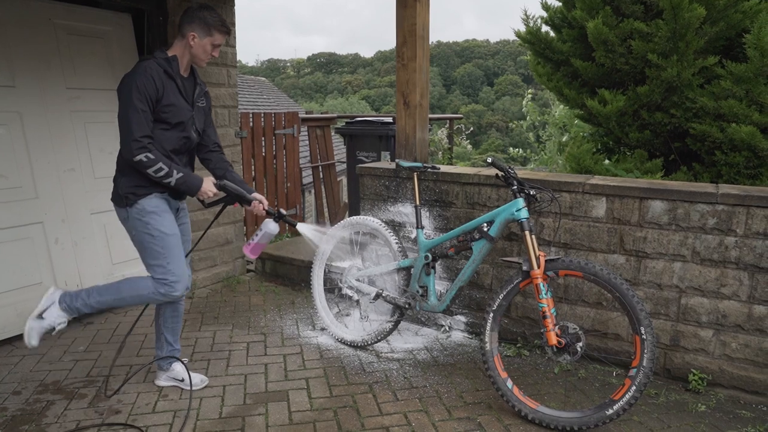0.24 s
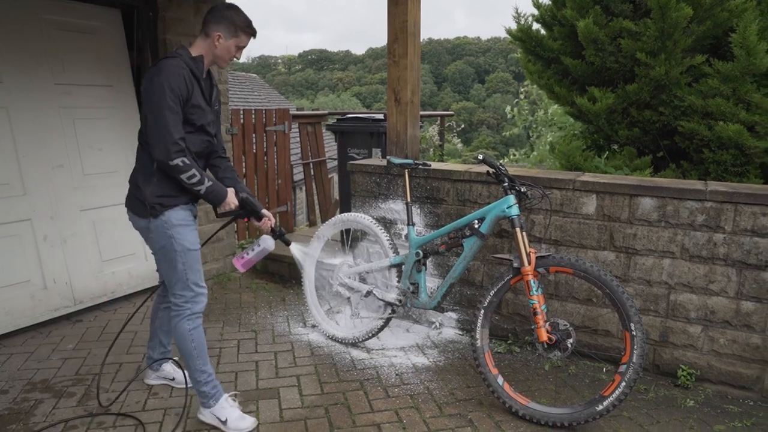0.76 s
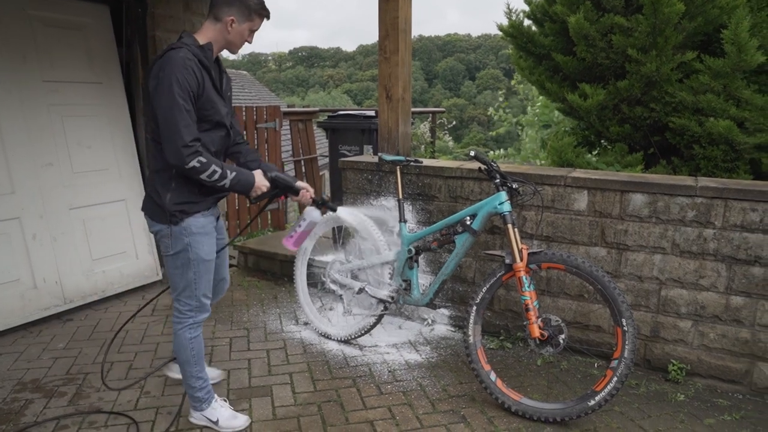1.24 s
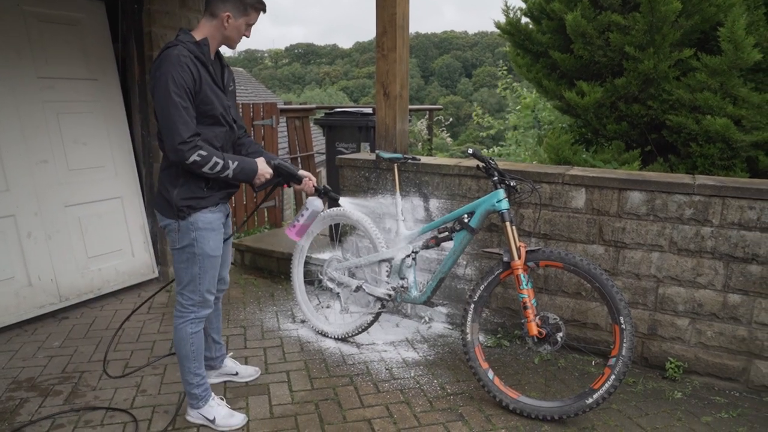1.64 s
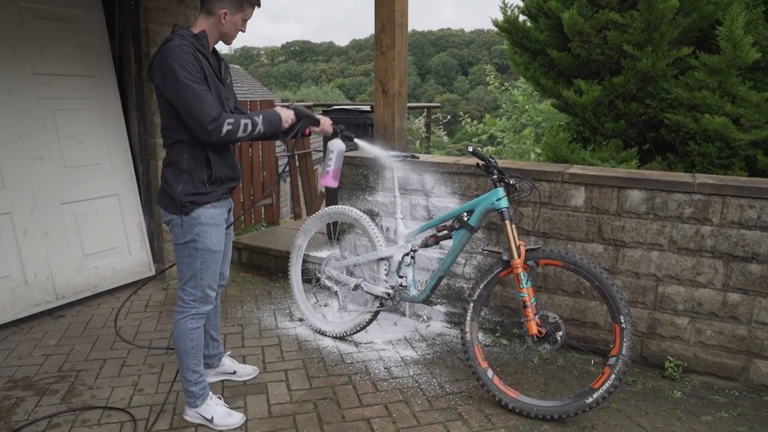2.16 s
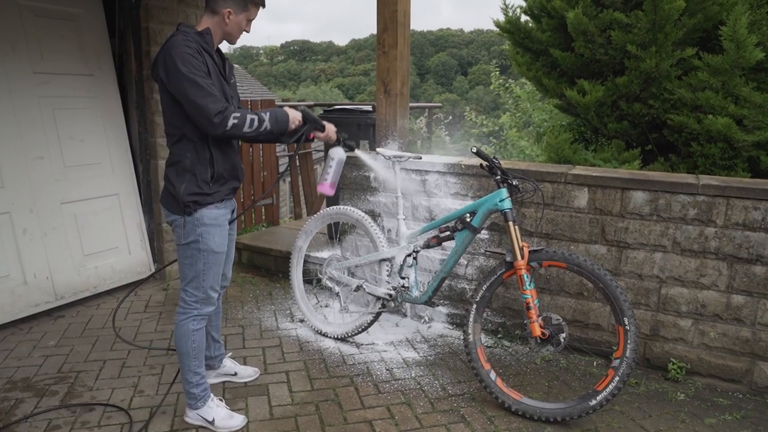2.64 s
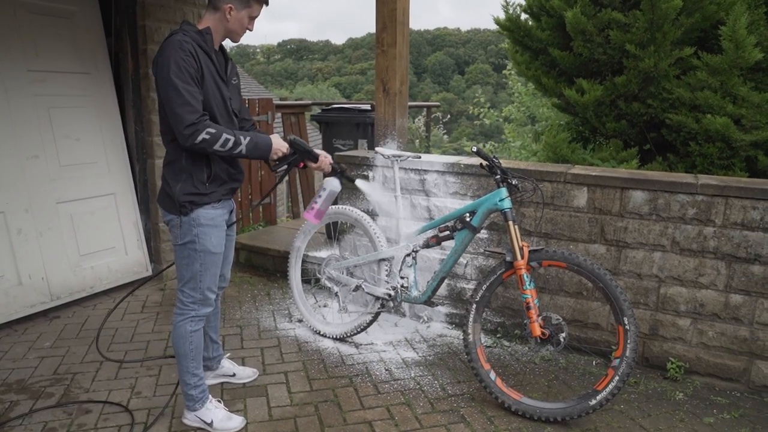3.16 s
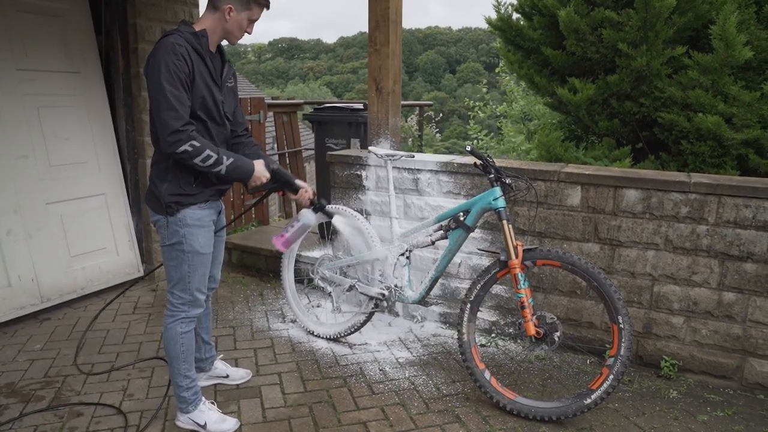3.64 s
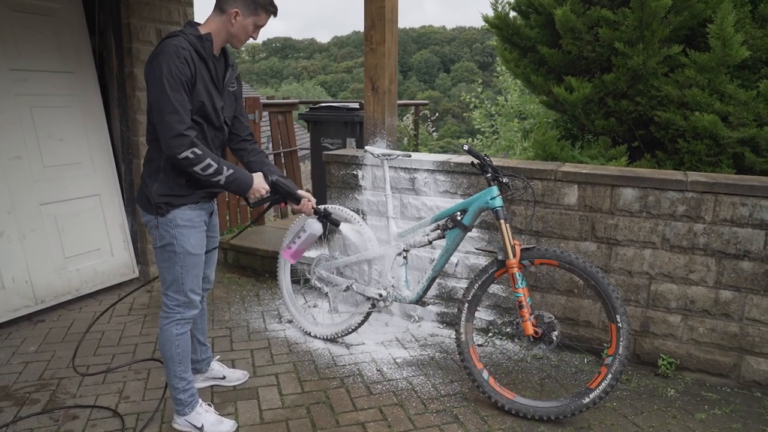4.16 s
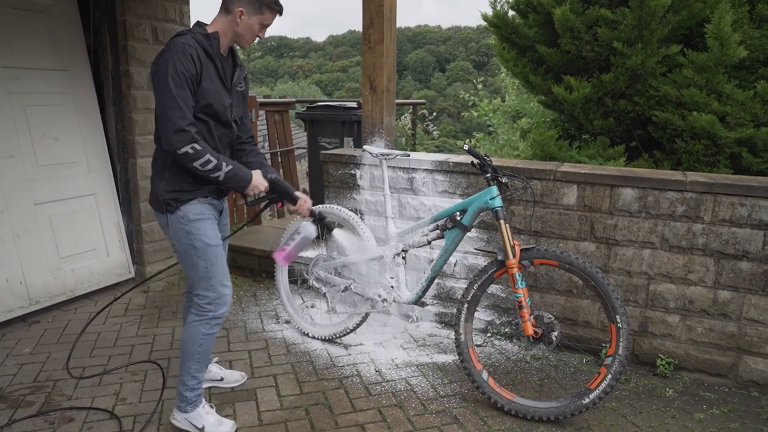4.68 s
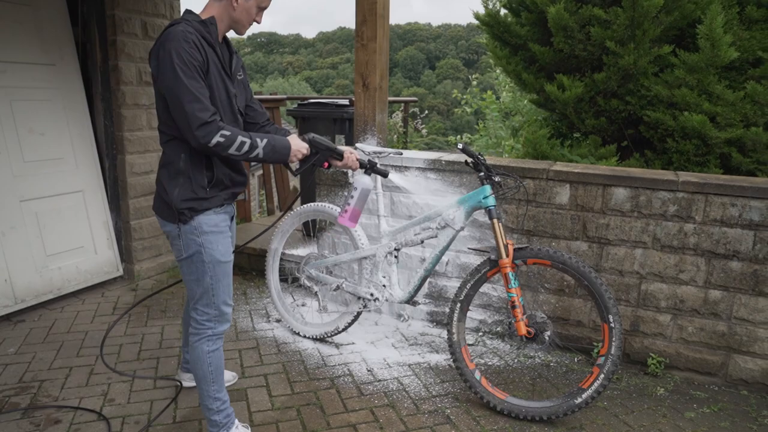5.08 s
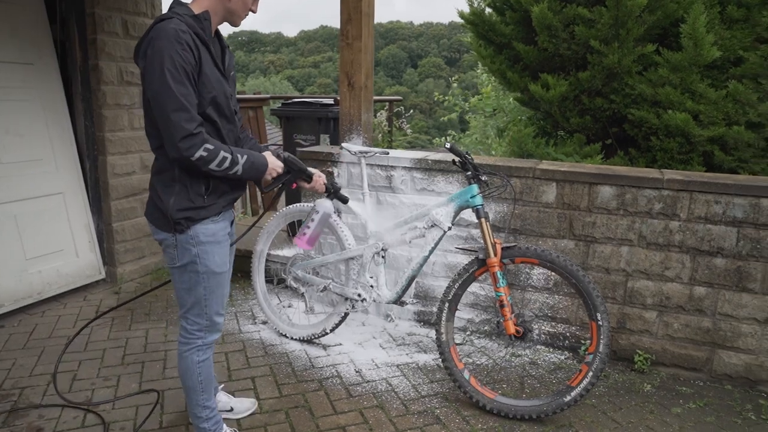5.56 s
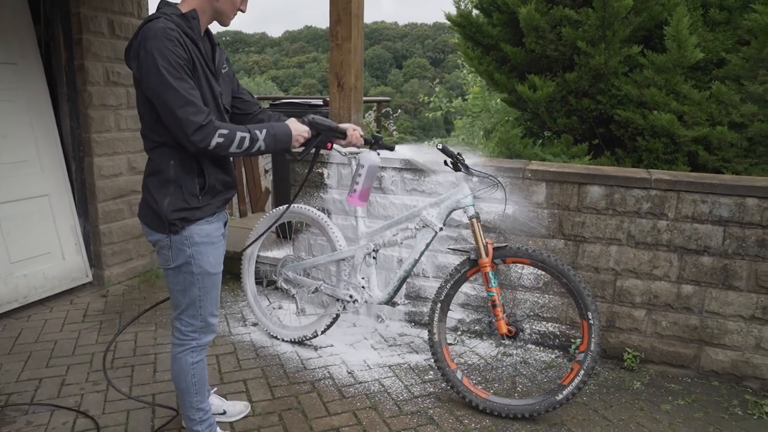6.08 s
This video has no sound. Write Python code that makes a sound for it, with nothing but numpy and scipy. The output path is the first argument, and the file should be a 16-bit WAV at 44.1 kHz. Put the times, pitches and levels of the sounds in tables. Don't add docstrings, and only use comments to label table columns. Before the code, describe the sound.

Foam lance hisses and faintly whistles over a constant pitched pump whine, foam spattering on frame and wall, the hiss gradually easing.

```python
import sys
import numpy as np
from scipy import signal
from scipy.fft import rfft, irfft
from scipy.io import wavfile

SR = 44100
rng = np.random.default_rng(int(sys.argv[2]) if len(sys.argv) > 2 else 0)


def to_wav(s):
    ch = np.atleast_2d(s).T
    pcm = np.round(np.clip(ch, -1, 1) * 32767)
    wavfile.write(sys.argv[1], SR, pcm.astype(np.int16))


def level_to_linear(level):
    exponent = np.asarray(level, float) / 20
    return 10 ** exponent


N = 278712

# [t/s, level/dB]
AIR_FLOW = [(0, -16.5), (.3, -17.5), (.7, -18.5), (1.2, -19), (2.0, -20), (2.55, -21), (2.9, -19.5),
            (3.4, -20), (4.0, -20.5), (4.9, -20.5), (5.3, -19.5), (5.7, -22), (6.05, -20), (6.32, -22)]
# [t/s, level/dB]
FOAM_HITS = [(0, -39), (.15, -33), (.53, -30), (.84, -34.5), (1.45, -30), (1.7, -35), (1.82, -36.5),
             (2.2, -33), (2.8, -33), (2.92, -40), (3.2, -37), (3.5, -32.5), (3.8, -32.5), (4.9, -32.5),
             (5.3, -34), (5.65, -34.5), (6.07, -30.5), (6.32, -31)]
# [t/s, length/s, voice, rounded (0 to 3 lance, 4 jet, others
# none), level/dB]
FOAM_SURGES = [(1.1, .2, 0, 3), (4.02, 0.21, 0, 4), (5.5, .2, 0, -0.5), (2.2, 0.16, -2, 1.5),
               (5.1, 0.11, 0, 0), (6.15, 0.18, -0.5, 2.5), (.2, .15, -0.5, 0), (0.47, 0.2, 1.5, -1),
               (1.55, 0.18, 0.5, -0.5), (1.84, 0.24, 1, 1.5), (2.6, .1, 1.5, -1.5), (5.03, 0.082, 1, 1),
               (6.05, .12, 6, 1.5), (0.42, .15, 3, 1.5), (1.62, .1, 5, 3), (1.77, 0.17, 1.5, -5),
               (2.95, 0.18, 3, 0.5), (3.2, .07, 1.5, 4), (5.03, 0.085, 2.5, 1), (5.45, 0.27, 3.5, -0.5),
               (1.02, 0.27, 3, -3), (1.53, 0.2, 3.5, 1.5), (6.6, 0.41, 3, 2.5), (2.22, .2, 4, 1.5),
               (3.12, .15, 4, 2), (5.06, 0.23, 4, 2), (5.7, 0.13, 4, -2), (.25, .4, 0, 1)]
SPUTTER_HZ = 6.3


def rms_one(x):
    return x / np.sqrt(np.mean(np.abs(x) ** 2))


def in_time(rows):
    s, *columns = np.transpose(rows)
    return [np.interp(np.arange(N) / SR, s, c) for c in columns]


def swing(rows):
    db = in_time(rows)[0]
    return db - db.mean()


def drift(rate):
    r = np.exp(-80 * np.pi * rate / SR)
    white = rng.standard_normal(N // 40 + 2002)
    slow = signal.lfilter([1], [1, -2 * r, r * r], white)[2000:]
    return np.interp(np.arange(N) / 40, np.arange(len(slow)), rms_one(slow))


def hump(s, length):
    shape = np.hanning(41)
    moments = s + 1.35 * length * np.linspace(-1, 1, len(shape))
    return np.interp(np.arange(N), SR * moments, shape)


def passing(rows, who):
    return sum(db * hump(s, length) for s, length, part, db in rows if round(part) == who)


def complex_noise():
    return rng.standard_normal(N) + 1j * rng.standard_normal(N)


def coloured(colour, patchy_db, shared_db, white):
    octave = np.log2(np.fft.rfftfreq(N, 1 / SR) + 1)
    hz, db = np.transpose(colour)
    shaped = rfft(white) * level_to_linear(np.interp(octave, np.log2(hz), db, left=-90))
    out = 0
    for centre in np.arange(np.log2(hz[0]), np.log2(SR / 2), .5):
        band = np.cos(np.pi * np.clip(octave - centre, -.5, .5)) ** 2
        out = out + irfft(shaped * band, N) * level_to_linear(patchy_db * drift(17.0))
    return rms_one(out * level_to_linear(shared_db * drift(40)))


def air_column(modes, tuning):
    out = 0
    for hz, width, db, wander in modes:
        r = np.exp(-np.pi * width / SR)
        sway = signal.lfilter([1], [1, -r], complex_noise())
        sway = signal.lfilter([1], [1, -r ** 3], sway)
        centre = tuning + hz + wander * drift(4)
        tone = np.real(sway * np.exp(2j * np.pi * np.cumsum(centre) / SR))
        out = out + level_to_linear(db) * rms_one(tone * level_to_linear(1.15 * drift(14.0)))
    return out


def machine():
    gear = 50 / 11
    # [t/s, turns per s]
    shaft_speed = [(0, 80.08), (.3, 80.11), (.65, 80.14), (.85, 80.32), (1.05, 80.73), (1.15, 80.69),
                   (1.4, 80.42), (1.8, 80.36), (2.3, 80.22), (2.55, 80.2), (2.8, 80.32), (3.6, 80.37),
                   (3.9, 80.46), (4.65, 80.45), (4.85, 80.58), (5.3, 80.6), (6.05, 80.73), (6.32, 80.7)]
    # [t/s, f/Hz, level/dB]
    open_path = [(0.0, 357.5, -26.5), (0.07, 362.3, -27.5), (0.26, 364.8, -28), (0.84, 364.9, -30),
                 (1.04, 366.8, -30.5), (1.43, 365.6, -33), (2.89, 365.2, -31), (4.4, 365.9, -32.5),
                 (4.81, 365.9, -31.5), (5.26, 365.6, -33), (6.05, 366.7, -33.5), (6.32, 366.8, -34.5)]
    loud_orders = (3, 6, 8, 9)
    loud_lines_db = (-8.5, -1.5, -8.5, 6)
    # [t/s, length/s, pump order, level/dB]
    crossings = [(0.73, 0.16, 3, -4), (1.15, .3, 3, 1.5), (1.45, .25, 3, -2), (0.52, 0.13, 6, -7.5),
                 (1.0, .4, 6, -2.5), (4.37, 0.86, 6, 2.5), (.2, 0.94, 8, 3), (0.51, 0.069, 8, 0),
                 (2.2, 0.66, 8, -4.5), (5.6, 1.1, 8, 6), (.05, 0.29, 9, -4), (1.07, 0.24, 9, -5.5),
                 (5.58, 0.96, 9, -5.5)]
    # [multiple of pump turn, level/dB]
    pump_lines = [(1, -66), (2, -64), (4, -48), (5, -46), (7, -49), (10, -40), (11, -39), (12, -36),
                  (13, -44), (14, -43), (15, -38), (16, -47), (17, -46), (18, -46), (19, -44), (20, -49),
                  (21, -56), (22, -57), (24, -51), (25, -52), (27, -48)]
    # [multiple of rotor turn, multiple of pump turn, level/dB]
    rotor_lines = [(1, -1, -48), (-1, 8, -55), (-1, 9, -54), (1, 1, -70), (2, 0, -41), (2, 1, -52),
                   (2, -4, -62), (1, 9, -47), (1, 10, -48), (11, 0, -43), (11, 1, -53), (12, 0, -50),
                   (11, 6, -61), (11, 8, -51), (22, 0, -50)]
    # [f/Hz, level/dB]
    mains_hum = [(100, -93.5), (300, -55.5), (346, -57), (466, -58), (506, -54.5), (600, -54.5)]

    rotor_db = in_time(open_path)[1]
    phase = 2 * np.pi * np.cumsum(in_time(shaft_speed)[0]) / SR

    def line(order):
        return np.sin(order * phase + rng.uniform(0, 2 * np.pi))

    out = level_to_linear(rotor_db) * line(gear)
    for k, db in zip(loud_orders, loud_lines_db):
        out += level_to_linear(rotor_db + db + passing(crossings, k)) * line(k)
    weak = [(round(k), db) for k, db in pump_lines]
    weak += [(round(a) * gear + round(b), db) for a, b, db in rotor_lines]
    near = level_to_linear(rotor_db + 32.0)
    out += near * sum(level_to_linear(db + 1.5 * drift(1.5)) * line(k) for k, db in weak)
    out += sum(level_to_linear(db) * np.sin(2 * np.pi * hz * np.arange(N) / SR) for hz, db in mains_hum)
    return np.sqrt(2) * out


def lance():
    # [f/Hz from the tuning or from zero, width/Hz, level/dB, wander/Hz]
    throat_modes = [(0, 73, -5.5, 20), (-90.5, 37, -6, 18), (100, 158, -7.5, 30)]
    tube_modes_1 = [(-10, 138, -5, 25), (0, 354, -5, 50), (219.5, 460, -7, 60)]
    tube_modes_2 = [(0, 118, -5.5, 30.03), (0, 353, -1.5, 49.63)]
    nozzle_modes = [(6006, 105, -4.5, 40), (5962, 1020, -1, 50)]
    # [t/s, first tube mode f/Hz, second tube mode f/Hz]
    tube_tuning = [(0.0, 2500, 3650), (0.17, 2480, 3440), (0.3, 2400, 3630), (0.37, 2528, 3580),
                   (1.55, 2520, 3510), (1.58, 2420, 3530), (1.9, 2622, 3540), (1.94, 2501, 3479),
                   (3.2, 2580, 3480), (3.33, 2469, 3550), (3.59, 2534, 3530), (4.07, 2426, 3440),
                   (4.12, 2500, 3510), (5.1, 2498, 3480), (5.35, 2625, 3510), (5.38, 2540, 3560),
                   (6.28, 2553, 3540), (6.32, 2640, 3530)]
    # [level/dB against the flow, share of the flow's swing, sputter/dB]
    lance_voices = [
        (-7.5, 1.2, -0.3),
        (-2.5, 0.62, 0.36),
        (-4.5, 1.12, 0.74),
        (-9, 1.3, 1.05),
    ]
    throat_hz = 962
    slosh_hz, slosh_rate_hz = 15, 5.0

    mean_db, flow_db = in_time(AIR_FLOW)[0].mean(), swing(AIR_FLOW)
    tube_hz = [hz + slosh_hz * drift(slosh_rate_hz) for hz in in_time(tube_tuning)]
    tunings = [throat_hz] + tube_hz + [0]
    groups = (throat_modes, tube_modes_1, tube_modes_2, nozzle_modes)
    out = 0
    for k, (modes, (db, share, sputter_db)) in enumerate(zip(groups, lance_voices)):
        level_db = mean_db + db + share * flow_db
        level_db = level_db + passing(FOAM_SURGES, k) + sputter_db * drift(SPUTTER_HZ)
        out = out + level_to_linear(level_db) * air_column(modes, tunings[k])
    return out


def jet():
    # [f/Hz, width/Hz, level/dB, wander/Hz]
    jet_modes = [(7690, 580, -5, 110), (8246, 1140, -4, 100), (9170, 220, -11, 60)]
    opening_db, settle_s = 6, 1.0
    level_db = -25.5 + .4 * swing(AIR_FLOW) + .25 * swing(FOAM_HITS)
    level_db = level_db + passing(FOAM_SURGES, 4) + .6 * drift(SPUTTER_HZ)
    core = level_to_linear(opening_db * hump(0, settle_s)) * air_column(jet_modes[:1], tuning=0)
    return level_to_linear(level_db) * (core + air_column(jet_modes[1:], tuning=0))


def patio(x):
    # [delay/s, level/dB]
    echo_paths = [
        (.004, -7.5),
        (.009, -6),
        (.017, -5.5),
    ]
    now = np.arange(N)
    echoes = 0
    for lag, db in echo_paths:
        path = SR * lag * (1 + 0.0406 * drift(0.78))
        echoes = echoes + level_to_linear(db) * np.interp(now - path, now, x)
    return level_to_linear(-2.0) * (x + echoes)


def whistles():
    # [t/s, length/s, f/Hz, glide/Hz per s, level/dB]
    singing = [(.2, 0.18, 2440, -200, -24), (.42, 0.2, 3596, -100, -27), (1.623, .12, 3540, 4, -24.5),
               (2.9, 0.32, 3440, 241, -27), (3.33, 0.23, 2500, -350, -20), (3.78, 0.14, 3485, 2, -27.5),
               (5.03, .12, 2503, 0.5, -27.5), (.88, 0.14, 3720, 302, -30), (1.8, .2, 2430, 598, -26),
               (5.201, .3, 7900, 0, -30.5), (5.05, 0.17, 3436, 100, -29)]
    width_hz = 72
    r = np.exp(-np.pi * width_hz / SR)
    sway = rms_one(signal.lfilter([1], [1, -2 * r, r * r], complex_noise()))
    tones = np.zeros(N, complex)
    for s, length, hz, glide, db in singing:
        level = level_to_linear(db) * hump(s, length)
        heard = level > 0
        since = np.flatnonzero(heard) / SR - s
        tones[heard] += level[heard] * np.exp(2j * np.pi * (hz + glide * since / 2) * since)
    return np.sqrt(2) * np.real(sway * tones)


def splash():
    # [f/Hz, level/dB per Hz]
    spray_colour = [(3000, -10), (5000, -1), (8500, 3), (10300, -3.5), (12000, -1), (13700, 0),
                    (14600, -4.5), (16500, -6.5)]
    # [t/s, length/s, level/dB]
    fan_skips = [
        (.96, 0.14, -6),
        (1.18, .04, -2.5),
        (1.341, .05, -5),
        (3.25, .06, 3),
        (3.371, .07, -2.5),
        (3.88, .07, -2),
        (5.04, .08, 4),
        (5.95, .04, -1.5),
        (6.2, .1, -6),
    ]
    sizes = level_to_linear(2.9 * np.minimum(rng.exponential(1, N), 5)) * rng.choice([-1, 1], N)
    drops = rms_one(sizes * (rng.random(N) < 6000 / SR))
    white = rng.standard_normal(N) + 1.4 * drops
    skips_db = sum(db * hump(s, length) for s, length, db in fan_skips)
    level_db = in_time(FOAM_HITS)[0] + skips_db + 4.5
    return level_to_linear(level_db) * coloured(spray_colour, patchy_db=0.55, shared_db=.8, white=white)


def rush():
    # [f/Hz, level/dB per Hz]
    rush_colour = [(45, -25), (110, -24), (180, -18), (260, -13), (350, -9), (450, -9), (760, -5),
                   (900, -1), (1300, 0), (1660, 3), (1900, 0), (4500, -3), (8500, -6), (10300, -21)]
    level_db = -31.5 + 6.5 + 0.52 * swing(AIR_FLOW)
    white = rng.standard_normal(N)
    return level_to_linear(level_db) * coloured(rush_colour, patchy_db=1.0, shared_db=0.86, white=white)


def breeze():
    # [t/s, length/s, level/dB]
    wind_puffs = [
        (.1, .8, -61),
        (.7, .25, -56),
        (1.05, .2, -57),
        (1.65, .26, -48),
        (2.27, .22, -52),
        (2.7, .25, -64),
        (6.1, .35, -59),
    ]
    still_air_db = -68
    band = signal.butter(2, [10, 28], "band", fs=SR, output="sos")
    air = signal.sosfilt(band, rng.standard_normal(N + SR))[SR:]
    strength = level_to_linear(still_air_db) + sum(level_to_linear(db) * hump(s, length) for s, length, db in wind_puffs)
    return level_to_linear(5) * strength * rms_one(air)


def side_bursts():
    # [t/s, low f/Hz, high f/Hz, level/dB]
    burst_bands = [(1.19, 6890, 8268, -35), (1.446, 9646, 11003, -41), (1.933, 5211, 6287, -35),
                   (2.212, 11714, 13092, -44), (3.21, 6287, 7579, -37), (3.768, 4651, 6287, -34),
                   (5.347, 4220, 7558, -33), (5.556, 6912, 9625, -34), (6.159, 11692, 13802, -49)]
    out, size = np.zeros(N), 2048
    for s, low_hz, high_hz, db in burst_bands:
        band = signal.butter(8, [low_hz, high_hz], "band", fs=SR, output="sos")
        burst = signal.sosfilt(band, rng.standard_normal(2 * size))[size:] * np.hanning(size)
        first = round(s * SR)
        out[first:first + size] += level_to_linear(db) * rms_one(burst)
    return out * [[1], [-1]]


def scene():
    mix = machine() + patio(lance() + jet()) + whistles() + splash() + rush() + breeze()
    return np.tile(mix, (2, 1))


def roll_off(x):
    return signal.sosfilt(signal.butter(12, 16920, fs=SR, output="sos"), x)


def record(dry):
    cutoff_hz = 15730
    rounded = dry / (1 + np.abs(dry) ** 6) ** (1 / 6)
    kept = np.fft.rfftfreq(N, 1 / SR) < cutoff_hz
    mix = irfft(rfft(rounded) * kept, N) + side_bursts()
    return roll_off(mix)


dry = scene()
out = record(dry)
to_wav(out)
```